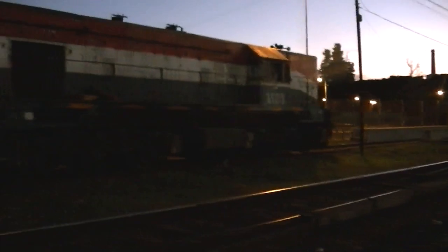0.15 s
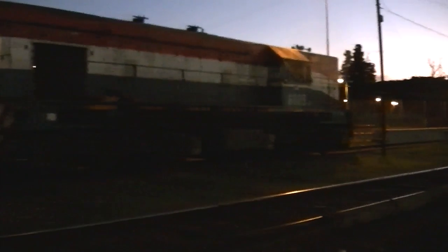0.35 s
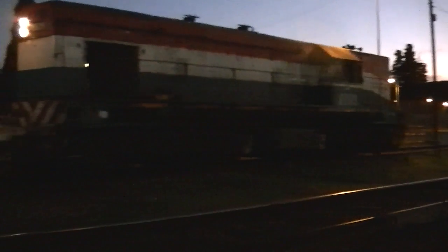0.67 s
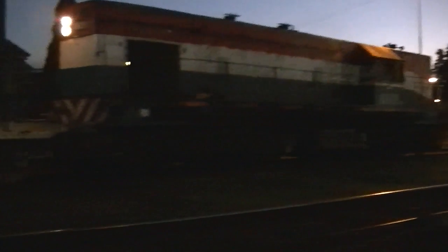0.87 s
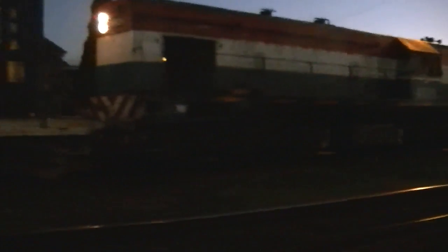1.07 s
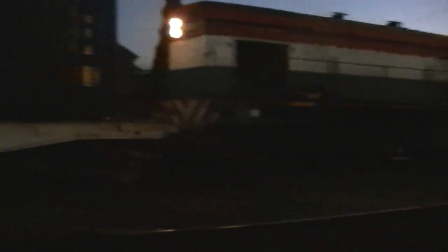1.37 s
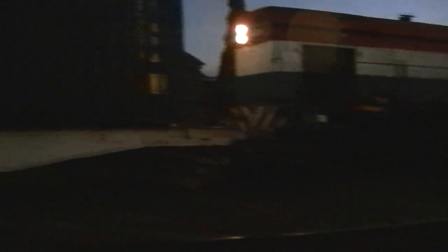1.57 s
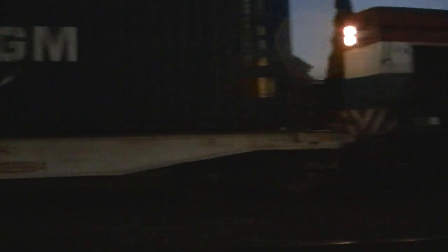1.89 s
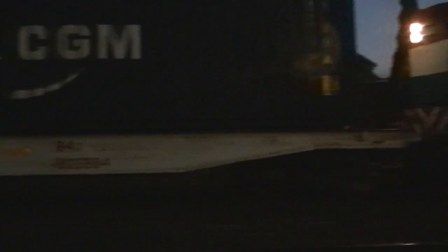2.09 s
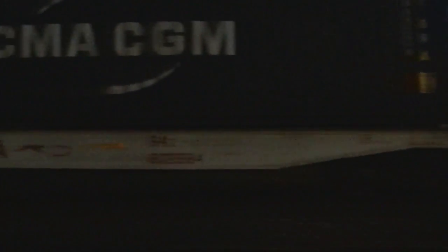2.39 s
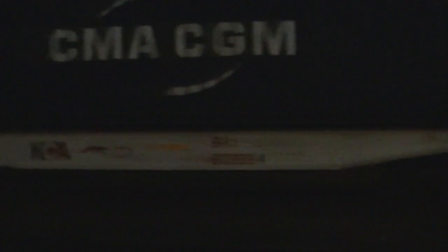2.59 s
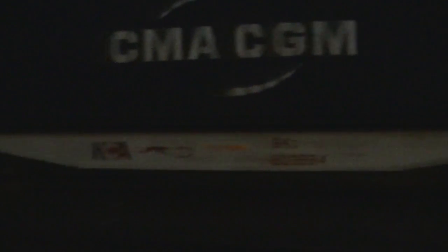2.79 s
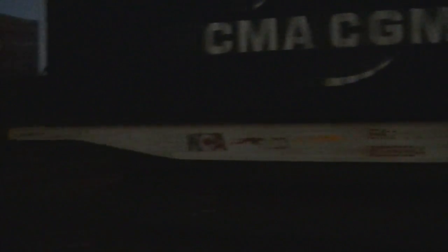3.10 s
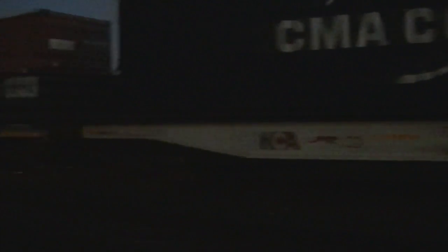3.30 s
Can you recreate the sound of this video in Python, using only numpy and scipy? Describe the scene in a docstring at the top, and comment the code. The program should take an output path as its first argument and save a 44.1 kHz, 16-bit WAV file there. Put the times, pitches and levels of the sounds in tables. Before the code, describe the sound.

Throbbing diesel train engine passing close, with a steady whine, light rattles and wheel clunks.

```python
"""Beside a railway track, a diesel locomotive rolls past close by, container wagons behind it.
Its twelve-cylinder two-stroke engine idles: every turn of the crank repeats one uneven round of exhaust
thuds, knocks and clatter. Steady engine harmonics and higher gear whine lie on multiples of the crank
rate, and a loose part rattles. Wheels rumble and tick below; the treble fades as the engine leaves."""
import sys
import numpy as np
from scipy import signal
from scipy.fft import rfft, irfft, next_fast_len
from scipy.io import wavfile

SR = 44100
rng = np.random.default_rng(int(sys.argv[2]) if len(sys.argv) > 2 else 0)


def master_out(mix):
    """Clip the mix to full scale and print it as 16-bit PCM to the path in sys.argv[1]."""
    frames = np.transpose(np.atleast_2d(mix))
    ceiling = np.clip(frames, -1, 1)
    pcm = np.round(ceiling * 32767).astype(np.int16)
    wavfile.write(sys.argv[1], SR, pcm)


N = 152145
T = np.arange(N) / SR
CRANK_HZ = 4.441
# one round of firings: (crank angle [degrees], thud [dB], exhaust [dB], knock [dB], clatter [dB])
CYLINDERS = [(31.12, -0.5, 0.5, 1, 4.5), (56.06, -2.5, -2, -3, 5), (70.03, 2, 0, 1.5, 0),
             (98.63, -2.5, 1, 2, 2.5), (121.64, 2.5, 0, 3, 3), (156.4, 0, 0.5, -0.5, 6.5),
             (175.65, 1.5, -0.5, 2, 0), (217, -2, 1, 2, 4), (250.3, 1.5, 1, 2, 4.5), (280, 0.5, 3, 1, 6.5),
             (309.2, 2.5, -3, 3, -3), (342.6, 3, 2.5, -0.5, 3.5)]


def from_db(db):
    """Amplitude ratio: tenfold for every 20 dB."""
    return 10 ** (np.asarray(db) / 20)


def rms_one(x):
    """Normalisation to unit mean power."""
    return x / np.sqrt(np.mean(x ** 2) + 1e-20)


def level(rows):
    """Amplitude envelope through points of (time [s], level [dB])."""
    return from_db(np.interp(T, *np.transpose(rows)))


def colour(x, spectrum):
    """Spectral shaping by (frequency [Hz], level [dB]) points, falling off beyond the ends; rms 1."""
    hz, db = np.transpose(spectrum)
    size = next_fast_len(N + SR // 4)
    f = np.maximum(np.arange(size // 2 + 1) * SR / size, 1)
    skirts = np.minimum(1, np.minimum(f / hz[0], hz[-1] / f)) ** 2
    gain = from_db(np.interp(np.log(f), np.log(hz), db)) * skirts
    return rms_one(irfft(rfft(x, size) * gain, size)[:N])


def drift(rate_hz):
    """Slow random fluctuation: low-passed noise, rms 1."""
    step, settle = 40, 2000
    pole = np.exp(-2 * np.pi * step * rate_hz / SR)
    noise = rng.standard_normal(N // step + settle + 2)
    slow = signal.lfilter([1], [1, -2 * pole, pole * pole], noise)[settle:]
    return np.interp(np.arange(N) / step, np.arange(len(slow)), rms_one(slow))


def swell(centre_s, width_s):
    """Gaussian envelope: a rounded rise and fall."""
    return np.exp(-2 * ((T - centre_s) / width_s) ** 2)


def throb(surges, width_s, depth, lag_s=0):
    """Periodic amplitude modulation: the same surges on every crank turn; rms 1."""
    turn_s = 1 / CRANK_HZ
    crests = 0
    for at_s, db in surges:
        offset_s = (T - lag_s - at_s + turn_s / 2) % turn_s - turn_s / 2
        crests = crests + from_db(db) * np.exp(-2 * (offset_s / width_s) ** 2)
    return rms_one(1 - depth + depth * crests)


def breathy(hz, width_hz):
    """Narrow-band noise: a pitch with no steady phase."""
    phase = 2 * np.pi * hz * T
    return drift(width_hz) * np.sin(phase) + drift(width_hz) * np.cos(phase)


def wheel_roar(patchy_db=1.4):
    """Rolling noise: wheels on rails radiate a broad band whose level wavers."""
    # (frequency [Hz], level [dB])
    spectrum = [(25, -62), (70, -15), (140, -10.5), (330, 2), (650, -2.5), (1500, -9.5), (3000, -16),
                (5000, -18), (8000, -30.5), (11000, -35.5), (15500, -47)]
    # (time [s], level [dB])
    passing = [(0, -31.5), (1.7, -35.5), (3.45, -30)]
    return level(passing) * from_db(patchy_db * drift(6.2)) * colour(rng.standard_normal(N), spectrum)


def wheel_ticks(per_s=63, spread_db=4, t60_s=0.011):
    """Impact excitation: faint random blows of steel on steel ring ten damped modes."""
    strength = from_db(spread_db * np.minimum(rng.exponential(1, N), 3))
    impacts = strength * (rng.random(N) < per_s / SR)
    pole = from_db(-60 / (t60_s * SR))
    ticks = 0
    for hz in np.geomspace(1300, 6000, 10):
        w = 2 * np.pi * hz / SR
        force = impacts * rng.standard_normal(N) + 1e-18
        ticks = ticks + signal.lfilter([0, np.sin(w)], [1, -2 * pole * np.cos(w), pole * pole], force) / hz
    return from_db(-50.5) * rms_one(ticks)


def rasp():
    """High-frequency rolling noise: the hiss of the first wagon's wheels swells and fades."""
    # (frequency [Hz], level [dB])
    spectrum = [(2500, -4), (3600, 3), (4600, -8), (8000, -19), (12000, -18), (15500, -34)]
    return from_db(-41.5) * swell(centre_s=1.93, width_s=0.99) * colour(rng.standard_normal(N), spectrum)


def clunks(attack_s=0.0068, decay_s=0.041):
    """Damped resonance: wheels and couplings knock dully, each around its own pitch."""
    # (time [s], pitch [Hz], level [dB])
    knocks = [(1.625, 680, -23), (1.848, 560, -24.5), (1.98, 700, -25), (2.322, 740, -28), (2.97, 600, -28)]
    # (frequency [multiple of the pitch], level [dB])
    resonance = [(.25, -26), (.7, -13), (1, 7), (1.3, -1), (3.6, -7), (7, -17), (15, -47)]
    out = 0
    for at_s, hz, db in knocks:
        age = np.maximum(T - at_s, 0)
        body = colour(rng.standard_normal(N), [(hz * ratio, gain_db) for ratio, gain_db in resonance])
        out = out + from_db(db) * (1 - np.exp(-age / attack_s)) * np.exp(-age / decay_s) * body
    return out


def rattles():
    """Contact noise: loose metal shakes in short bright bursts, and the hardest one squeaks."""
    # (time [s], width [s], level [dB])
    shakes = [(0.334, 0.02, -50), (0.413, .04, -42), (0.65, 0.073, -41.5), (.785, .025, -50),
              (.862, 0.022, -40), (1.088, 0.057, -39.5), (1.46, 0.014, -37), (1.534, 0.018, -40),
              (1.635, 0.027, -43), (1.992, 0.03, -43), (2.137, .025, -45), (2.364, .03, -47)]
    # (frequency [Hz], level [dB])
    spectrum = [(1500, -16), (3000, 2), (5500, 7), (7200, 4.5), (9300, -8), (11000, -10), (15500, -28)]
    envelope = sum(from_db(db) * swell(at_s, width_s) for at_s, width_s, db in shakes)
    squeak = from_db(-42.5) * swell(centre_s=1.46, width_s=.013) * breathy(9100, width_hz=90)
    return envelope * colour(rng.standard_normal(N), spectrum) + squeak


def whine(waver_db=0.4, wander_turns=0.00024):
    """Steady engine harmonics and higher gear whine on multiples of the crank rate; a thin whistle."""
    # (frequency [multiple of the crank rate])
    orders = [66, 98, 110, 122, 158, 165, 177, 328, 331, 395, 416, 474, 624, 728, 832, 936]
    # each tone as the engine room goes by: (before [dB], alongside [dB], after [dB])
    levels = [(-50, -56, -46), (-40.5, -46, -49.5), (-47, -51, -58), (-39.5, -41.5, -45), (-37, -37.5, -41),
              (-47, -37, -45.5), (-48, -51, -50), (-43.5, -45, -48.5), (-53, -46, -48), (-47, -49, -45),
              (-42.5, -40.5, -43), (-49.5, -50, -50), (-48, -49, -60), (-50, -51, -52.5), (-79, -50, -56),
              (-88, -64, -62)]
    passing_s = (1.1, 1.68, 2.2)
    turns = CRANK_HZ * T + wander_turns * drift(2.2)
    tones = 0
    for order, passing_db in zip(orders, levels):
        gain = from_db(np.interp(T, passing_s, passing_db) + waver_db * drift(5))
        tones = tones + gain * np.sqrt(2) * np.sin(2 * np.pi * (order * turns + rng.random()))
    return tones + from_db(-49) * breathy(2468, width_hz=12)


def gear_hum():
    """Amplitude modulation: the main gear tone and two overtones surge three times a turn."""
    # (frequency [multiple of the crank rate])
    orders = [79, 237, 316]
    # (surge lag [s], surge depth [0-1], noise share [0-1], level at each time in passing_s [dB])
    partials = [(.002, 0.84, 0.16, -36, -36.5, -35.5, -32.7), (.015, 0.41, 0.017, -38, -39, -36.5, -37),
                (.024, .7, .05, -37.5, -33.5, -40.5, -44.5)]
    passing_s = (1.25, 1.68, 2.2, 3.4)
    # (time within the turn [s], level [dB])
    surges = [(.04, 7), (.109, 1.8), (.193, 0)]
    out = 0
    for order, (lag_s, depth, noise_share, *passing_db) in zip(orders, partials):
        hz = order * CRANK_HZ
        pure = np.sqrt(2 * (1 - noise_share)) * np.sin(2 * np.pi * (hz * T + rng.random()))
        rough = np.sqrt(noise_share) * breathy(hz, width_hz=27)
        gain = from_db(np.interp(T, passing_s, passing_db))
        out = out + gain * throb(surges, width_s=.026, depth=depth, lag_s=lag_s) * (pure + rough)
    return out


def growl():
    """Resonance: a hollow band of engine noise chugs twice on every turn."""
    # (frequency [Hz], level [dB])
    resonance = [(600, -24), (700, 0), (780, 1), (860, -20)]
    # (time [s], level [dB])
    passing = [(0, -37), (1.4, -41.5), (2.3, -35), (3.45, -38)]
    surges = [(.074, 4.5), (.19, -6)]  # (time within the turn [s], level [dB])
    chug = throb(surges, width_s=0.041, depth=0.56)
    return level(passing) * chug * colour(rng.standard_normal(N), resonance)


def firings(strength_db, spectrum, ring_share, decay_s, uneven_db, attack_s=.004):
    """A pulse train: each decaying burst mixes its cylinder's repeating ring with fresh turbulence."""
    count, size = len(strength_db), SR // 8
    t = np.arange(size) / SR
    burst = (1 - np.exp(-t / attack_s)) * np.exp(-t / decay_s)
    rings = rng.standard_normal((count, size))
    out = np.zeros(N + 3 * size)
    for k in range(int(N / SR * CRANK_HZ * count) + 1):
        turn, cylinder = divmod(k, count)
        at = int((turn + CYLINDERS[cylinder][0] / 360) / CRANK_HZ * SR)
        ring = np.sqrt(ring_share) * rings[cylinder]
        turbulence = np.sqrt(1 - ring_share) * rng.standard_normal(size)
        gain = from_db(strength_db[cylinder] + uneven_db * rng.standard_normal())
        out[at:at + size] += gain * burst * (ring + turbulence)
    return colour(out[:N], spectrum)


def engine():
    """Common excitation: the firings time low thuds, exhaust bark, combustion knock and valve clatter."""
    # spectra of the four voices: (frequency [Hz], level [dB])
    thud_spectrum = [(25, -60), (45, -44), (65, -18.5), (95, -3.5), (135, 1.5), (175, -0.5), (230, -7.5),
                     (350, -13.5)]
    exhaust_spectrum = [(130, -22.5), (200, -12), (250, -3), (320, -4), (390, -3), (435, 0), (540, 0),
                        (660, 0.5), (950, -6.5), (1500, -15)]
    knock_spectrum = [(500, -8), (850, -2), (980, 0.5), (1300, -0.5), (1460, 1), (1600, -5), (1950, -1),
                      (2400, -7), (3200, -12), (4200, -18.5), (8000, -38)]
    clatter_spectrum = [(1500, -5), (3000, 3.5), (4000, -6.5), (5200, 0), (7000, -3.5), (9000, -6),
                        (11000, -15.5), (15500, -36)]
    # their envelopes as the engine passes: (time [s], level [dB])
    thud_level = [(0, -42), (1.2, -44), (2.4, -42), (3.45, -49.5)]
    exhaust_level = [(0, -26), (.5, -27), (1.35, -29), (1.9, -27.5), (2.5, -30.5), (3.45, -31.5)]
    knock_level = [(0, -28.5), (1.35, -28.5), (1.65, -28.5), (2.05, -31), (2.7, -30), (3.45, -34.2)]
    clatter_level = [(0, -39.5), (.8, -40), (1.35, -40), (1.7, -40.5), (2.1, -44), (2.5, -46), (3.0, -47),
                     (3.45, -54)]
    thud_db, exhaust_db, knock_db, clatter_db = np.transpose(CYLINDERS)[1:]
    thud = firings(thud_db, thud_spectrum, ring_share=0.65, decay_s=0.017, uneven_db=1.0)
    exhaust = firings(exhaust_db, exhaust_spectrum, ring_share=0.5, decay_s=.019, uneven_db=2.0)
    knock = firings(knock_db, knock_spectrum, ring_share=0.11, decay_s=0.035, uneven_db=1.07)
    clatter = firings(clatter_db, clatter_spectrum, ring_share=0.12, decay_s=0.045, uneven_db=0.95)
    return (level(thud_level) * thud + level(exhaust_level) * exhaust
            + level(knock_level) * knock + level(clatter_level) * clatter)


def scene():
    """Superposition: locomotive and running gear add at one point beside the track."""
    locomotive = engine() + growl() + gear_hum() + whine() + rattles()
    return (locomotive + wheel_roar() + wheel_ticks() + rasp() + clunks())[None]


def record(dry, start_s=.044, fade_s=.007, cutoff_hz=15800):
    """Gating and band limiting: the sound opens after a moment of silence, its top treble cut."""
    opened = dry * np.clip((T - start_s) / fade_s, 0, 1)
    return signal.sosfilt(signal.ellip(12, .1, 80, cutoff_hz, fs=SR, output="sos"), opened)


dry = scene()
out = record(dry)
master_out(out)
```